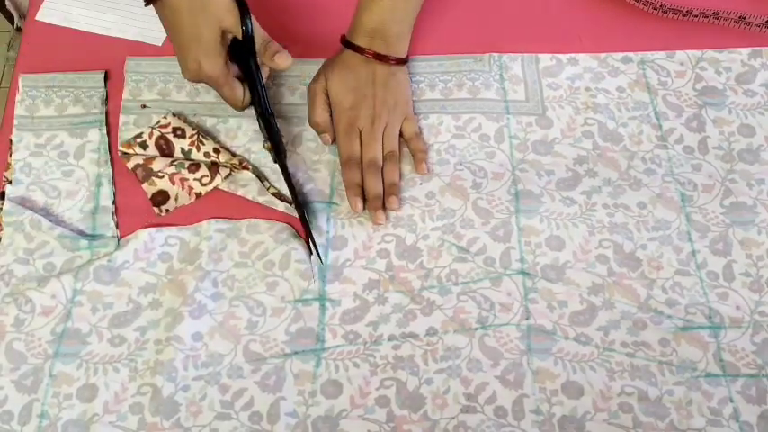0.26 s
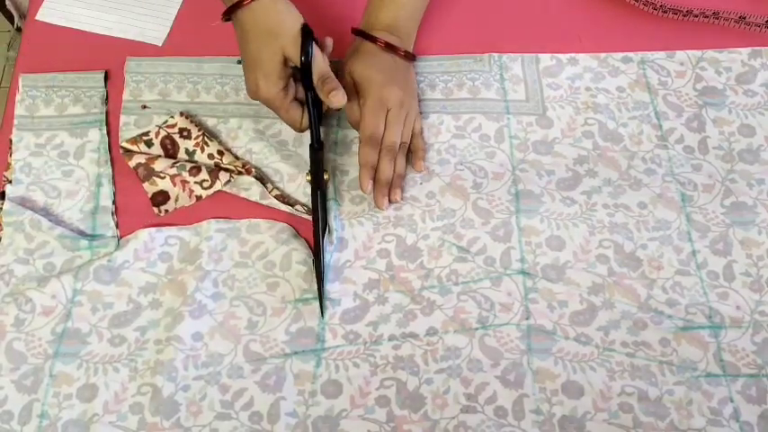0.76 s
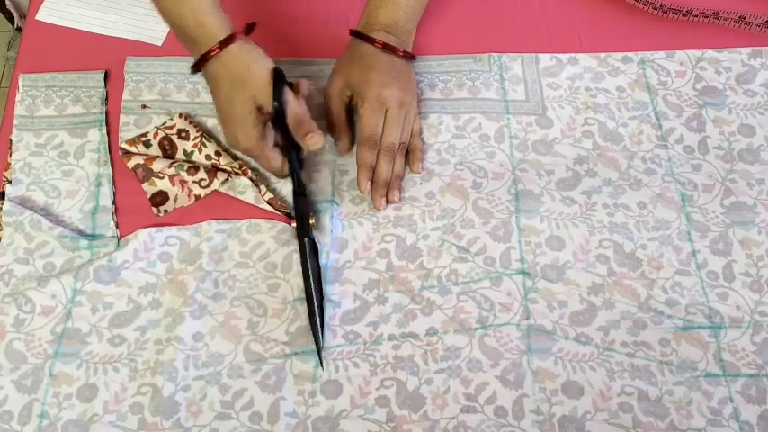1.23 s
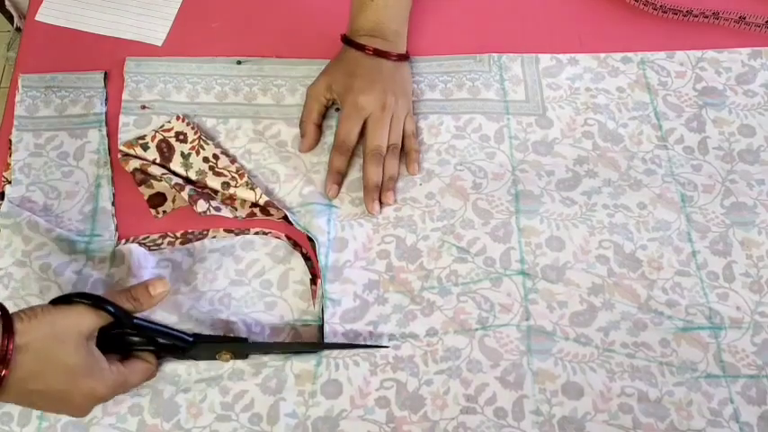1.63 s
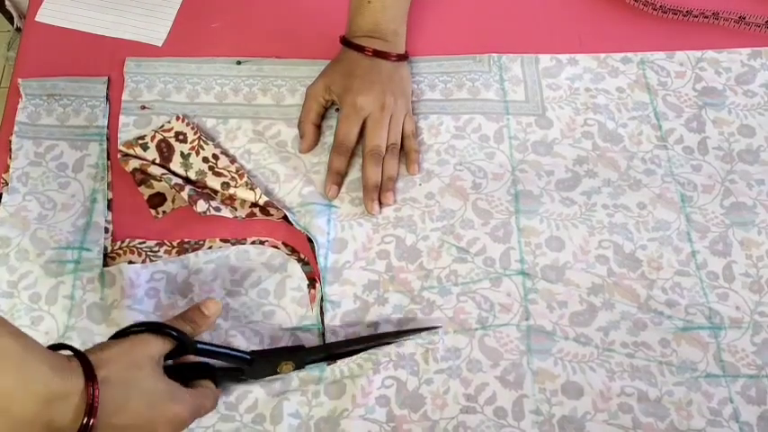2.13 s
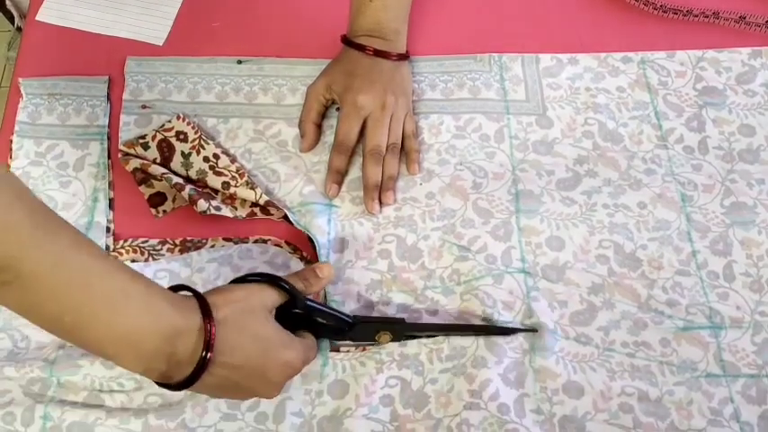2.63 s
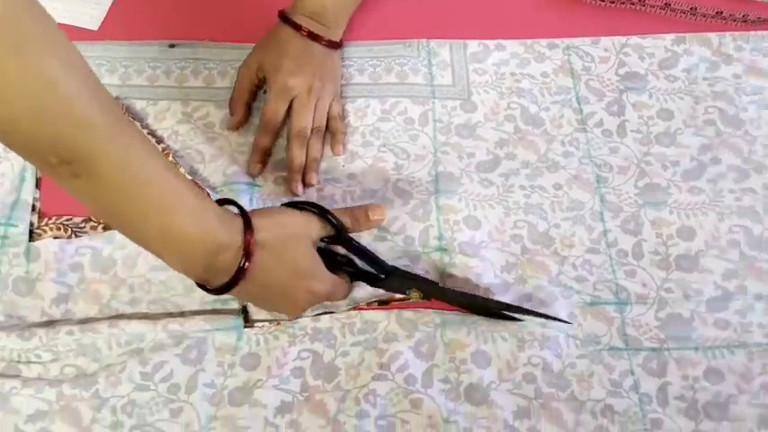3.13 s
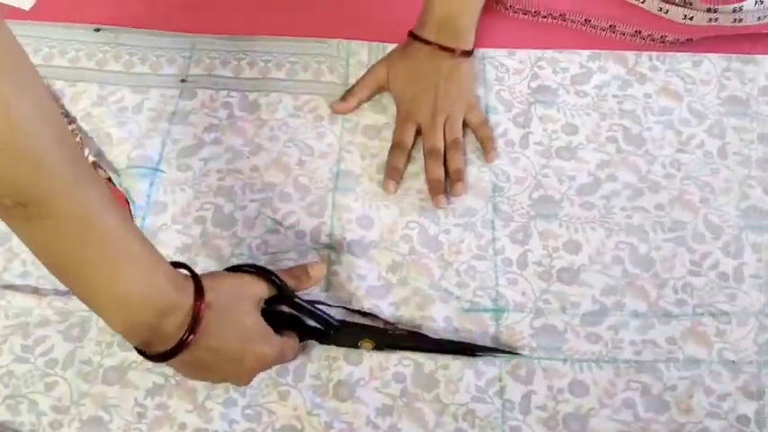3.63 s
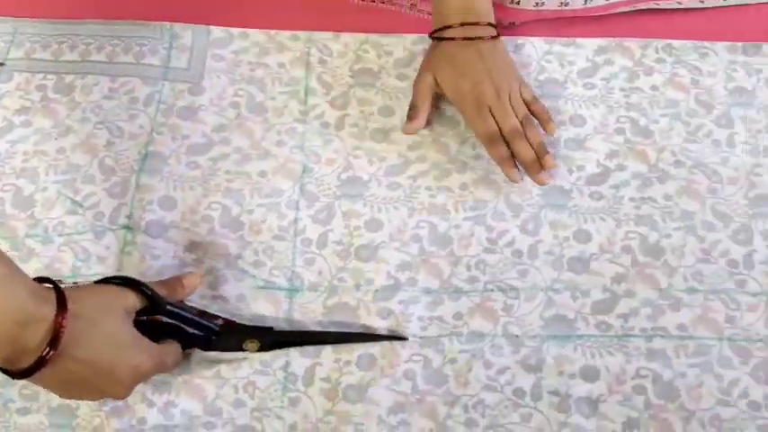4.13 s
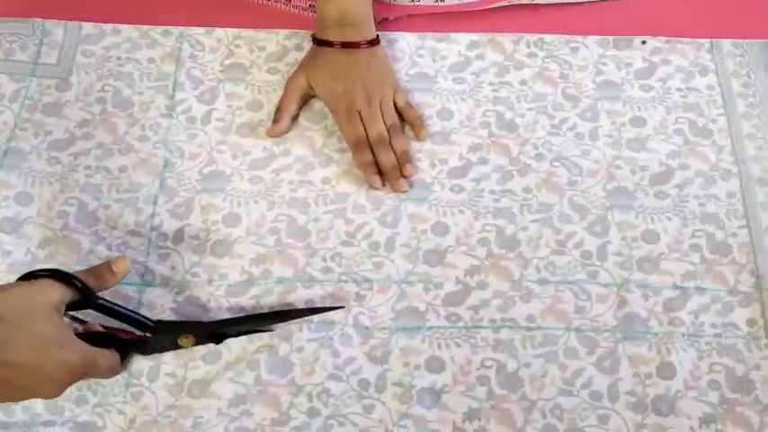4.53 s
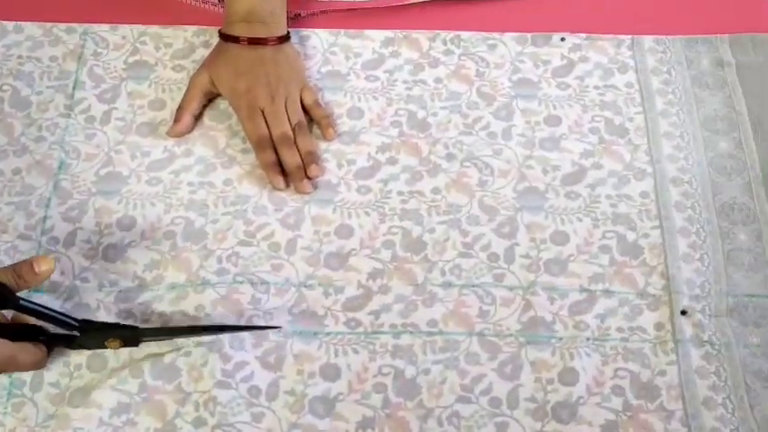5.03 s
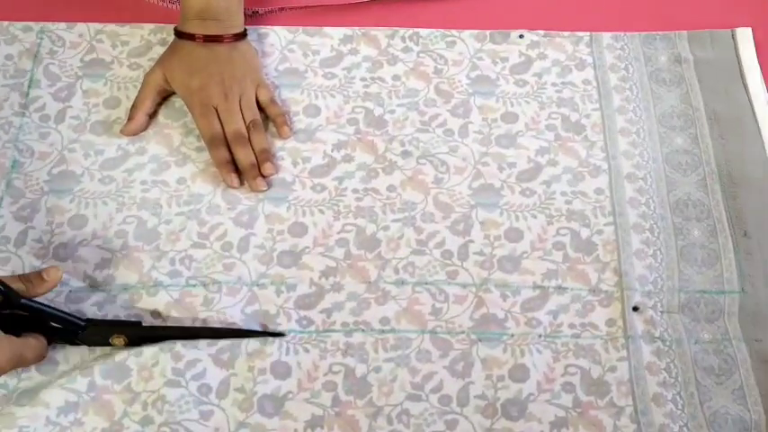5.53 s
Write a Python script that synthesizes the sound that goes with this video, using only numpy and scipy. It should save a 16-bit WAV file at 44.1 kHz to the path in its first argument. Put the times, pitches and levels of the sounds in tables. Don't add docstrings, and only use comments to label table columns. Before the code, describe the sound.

Close, rhythmic snipping of large shears through fabric, each cut a dull tabletop knock with gritty crackle and short metallic clack.

```python
import sys
import numpy as np
from scipy import signal
from scipy.fft import rfft, irfft, next_fast_len
from scipy.io import wavfile
from scipy.ndimage import uniform_filter1d, map_coordinates

SR = 44100
rng = np.random.default_rng(int(sys.argv[2]) if len(sys.argv) > 2 else 0)


def linear_from_db(decibels):
    return 10 ** (np.asarray(decibels, float) / 20)


def store_pcm(level_fs):
    pcm = np.round(np.clip(level_fs, -1, 1) * 32767).astype(np.int16)
    wavfile.write(sys.argv[1], SR, np.atleast_2d(pcm).T)


N = 254016

# (bite time [s], bite length [s], table level [dB], blade level [dB], thread level [dB])
CLOSINGS = [(0.0, 0.02, -47, -55.5, -55.5), (0.231, 0.046, -44, -57.5, -51),
            (0.65, 0.064, -48.5, -59.5, -51), (0.898, 0.045, -49, -51.5, -48.5),
            (1.138, 0.048, -44.5, -58, -51), (1.347, 0.042, -45, -57, -50),
            (1.986, 0.067, -41, -52.5, -49.5), (2.265, 0.051, -43.5, -56, -48.5),
            (2.508, 0.054, -38.5, -50.5, -51.5), (2.758, 0.063, -40.5, -47.5, -57),
            (3.012, 0.041, -59, -46.5, -49.5), (3.243, 0.055, -40, -51, -53.5),
            (3.488, 0.056, -47, -47.5, -54.5), (3.749, 0.064, -42.5, -50, -54.5),
            (4.01, 0.033, -48.5, -50, -56), (4.296, 0.051, -57.5, -51, -59.5),
            (4.559, 0.047, -42.5, -51, -49.5), (4.842, 0.031, -47, -51, -62),
            (5.461, 0.036, -50, -48.5, -61.5), (5.72, 0.036, -47.5, -44, -53)]
# (lead-in [s], lead-in depth [dB], swell [dB/s], release [s], release depth [dB])
STROKE_SHAPES = [
    (0.019, 19, -24.5, 0.042, 26.5),
    (0.017, 31, 23.5, 0.034, 33),
    (0.02, 33, -14, 0.037, 24),
    (0.012, 15, -3, 0.035, 26),
]
# (time [s], low blade mode over high [dB], crackle build-up through a bite [dB])
CLOTH_GRIP = [(0, -5, 2.5), (.65, -1, 11), (1.35, -8, 4), (2.0, 3, 8), (2.26, 7.5, 15.5), (2.8, -4.5, 4.5),
              (3.05, 5.5, 11.5), (3.5, 6, 12), (3.78, 12, 8.5), (4.03, 10.5, 8), (4.32, 4.5, 2),
              (4.58, 0.5, 7.5), (4.86, 3.5, 2), (5.48, 3.5, -6.5), (5.76, 2.5, 5.5)]
GRIND = [
    -3.5,
    -4,
    -1,
    0,
]
# (time [s], steel ring level [dB], knock level [dB],
# rustle level [dB])
OPENINGS = [(0.086, -79, -53, -90), (0.327, -70, -51.5, -79), (0.778, -76, -52.5, -85),
            (1.0017, -73, -51.5, -77), (1.236, -82, -52.5, -94), (2.099, -54, -56, -64),
            (2.619, -60, -44.5, -60), (2.881, -68, -45, -63), (3.1116, -58, -47.5, -57),
            (3.356, -78, -53, -60), (3.565, -45, -61, -59), (3.607, -65, -46.5, -63),
            (3.8644, -62, -55, -63.5), (4.101, -46, -63, -60.5), (4.4163, -59.5, -53.5, -84),
            (4.45, -45, -86, -71), (4.545, -46, -46, -83), (4.662, -64, -46.5, -63), (4.677, -58, -89, -85),
            (5.416, -55, -76, -73), (5.43, -50, -75, -63), (5.579, -70, -56.5, -81),
            (5.589, -55, -75, -62.5), (5.683, -49.5, -80, -72), (5.694, -44.5, -69, -70)]
# (time [s], peak level [dB])
THREAD_SNAPS = [(0.6804, -41), (0.7064, -55), (0.893, -56), (0.922, -42), (0.943, -33), (1.144, -45),
                (1.159, -28), (1.1762, -30.5), (1.3463, -59), (1.969, -37), (2.0113, -34), (2.0466, -35),
                (2.2625, -42), (2.29, -36), (2.3181, -46), (2.393, -42), (2.5087, -61), (2.5386, -36),
                (2.5637, -34), (2.7911, -42), (2.818, -24), (2.9986, -40.5), (3.035, -44), (3.0496, -41),
                (3.238, -42), (3.4815, -48), (3.543, -35.5), (3.753, -44), (3.775, -41), (3.8024, -21.5),
                (4.01, -35), (4.1719, -60), (4.288, -42), (4.4505, -51), (4.844, -38.5), (4.9441, -43),
                (5.4665, -51), (5.628, -49), (5.7284, -52)]
# (time [s], rustle level [dB], table level [dB], length [s])
CLOTH_TUGS = [(.04, -65.5, -59, 0.62), (.195, -59, -59, 0.067), (1.31, -55, -40, 0.058),
              (1.455, -69, -47.5, 0.089), (1.645, -76.5, -59, 0.37), (1.962, -45, -51, 0.019),
              (2.37, -58, -41, 0.057), (2.39, -43, -36.5, 0.031), (2.735, -56, -71, 0.074),
              (2.975, -69, -38.5, 0.072), (3.222, -65, -65, 0.044), (3.46, -54.5, -44, 0.098),
              (3.97, -56, -46.5, 0.037), (4.275, -57, -59, .05), (4.8, -61, -64, 0.07),
              (4.925, -52, -92, 0.073), (5.41, -64, -81, 0.13), (5.5, -57, -77, 0.049),
              (5.685, -54.5, -50, 0.075)]
# (time [s], level of blade resting on the table [dB], cloth drag level [dB])
SLIDING = [(0.0, -62.5, -69.5), (0.46, -60, -80), (1.07, -55, -86), (1.39, -63, -78.5),
           (2.32, -62.5, -83.5), (2.45, -62.5, -82.5), (2.6, -78, -79), (2.71, -60.5, -81),
           (3.5, -62.5, -75.5), (3.88, -69.5, -81.5), (4.38, -60.5, -78.5), (4.49, -74, -73.5),
           (5.07, -65.5, -82), (5.52, -55.5, -81.5), (5.63, -57.5, -86), (5.76, -59, -76)]
# (time [s], peak level [dB])
TABLE_BLOWS = [(0.228, -31), (0.261, -48), (0.652, -35), (0.668, -40), (0.704, -41), (0.901, -32),
               (0.924, -42), (1.014, -48), (1.136, -31), (1.163, -40), (1.182, -28), (1.335, -37.5),
               (1.349, -43), (1.368, -40), (1.39, -45), (1.984, -45), (1.995, -36), (2.006, -42),
               (2.034, -29.5), (2.057, -29.5), (2.254, -28.5), (2.269, -24), (2.284, -44), (2.299, -37),
               (2.319, -36), (2.397, -45), (2.513, -34), (2.532, -26), (2.544, -26), (2.568, -31.5),
               (2.753, -35), (2.771, -34.5), (2.783, -38), (2.797, -44), (2.822, -24.5), (2.849, -33),
               (2.998, -36), (3.029, -39), (3.26, -28), (3.484, -38), (3.503, -41), (3.518, -51),
               (3.763, -49), (3.783, -41), (3.803, -42), (3.819, -36.5), (4.016, -50), (4.032, -38.5),
               (4.053, -41), (4.297, -37.5), (4.31, -41), (4.552, -35.5), (4.566, -31.5), (4.61, -41),
               (4.839, -32), (4.854, -31), (5.135, -36.5), (5.455, -32.5), (5.475, -24), (5.72, -30)]
# (time [s], peak level [dB])
CORNER_BLOWS = [(.098, -57), (.121, -47.5), (.229, -37.5), (.264, -49), (.273, -41), (.333, -43.5),
                (.349, -43), (.654, -34), (.669, -32), (.79, -48), (.926, -37), (1.013, -45),
                (1.078, -48.5), (1.183, -35), (1.248, -51), (1.327, -44), (1.39, -46), (5.39, -52),
                (5.574, -46)]
# (time [s], level over the table top [dB])
CORNER_DRIVE = [(0, -9), (1.4, -8), (2.0, -6), (3.5, -18.5), (5.76, -16)]
# (time [s], peak level [dB])
LOW_BLOWS = [(0.928, -45), (0.942, -51), (1.148, -40.5), (1.183, -50), (1.99, -48), (2.001, -40),
             (2.015, -38), (2.026, -52), (2.051, -57), (2.287, -37), (2.302, -40), (2.32, -53),
             (2.513, -57), (2.534, -41), (2.563, -40.5), (2.76, -42.5), (2.796, -38), (2.816, -44),
             (2.999, -42.5), (3.016, -34), (3.028, -56), (3.04, -53), (3.052, -34.5), (3.063, -39),
             (3.244, -44), (3.258, -49), (3.274, -36.5), (3.284, -43), (3.297, -37.5), (3.481, -42),
             (3.495, -35.5), (3.508, -27.5), (3.526, -31), (3.547, -54), (3.749, -38), (3.76, -34),
             (3.773, -30.5), (3.794, -40), (3.803, -33.5), (3.814, -34), (4.019, -29), (4.036, -39),
             (4.052, -54), (4.297, -38), (4.308, -35), (4.317, -28.5), (4.332, -33.5), (4.345, -52),
             (4.553, -33), (4.566, -37), (4.585, -31), (4.611, -51), (4.845, -35.5), (4.86, -39),
             (5.46, -43), (5.478, -38), (5.496, -62), (5.715, -44), (5.738, -36), (5.752, -47)]
# (time [s], peak level [dB])
HIGH_BLOWS = [(0.094, -43.5), (0.898, -46), (0.909, -50), (0.924, -49), (1.141, -40.5), (1.15, -48),
              (1.162, -49), (1.997, -51), (2.009, -44), (2.048, -41.5), (2.265, -41), (2.305, -39),
              (2.501, -51), (2.527, -47), (2.537, -47), (2.556, -55), (2.566, -43.5), (2.761, -37),
              (2.795, -34), (2.817, -27.5), (2.834, -44), (2.844, -43), (3.016, -42), (3.035, -39),
              (3.052, -32.5), (3.062, -48), (3.071, -38), (3.231, -43.5), (3.241, -45), (3.249, -53),
              (3.269, -55), (3.277, -54), (3.3, -57), (3.5, -60), (3.517, -38), (3.526, -42), (3.541, -46),
              (3.631, -51), (3.745, -48), (3.756, -58), (3.776, -40), (3.806, -39), (3.817, -49),
              (4.014, -42), (4.026, -57), (4.046, -52), (4.299, -40), (4.316, -36.5), (4.327, -44),
              (4.349, -53), (4.55, -50), (4.581, -35), (4.611, -41), (4.855, -44), (4.87, -44),
              (5.477, -37), (5.491, -38), (5.73, -34), (5.746, -48), (5.754, -54)]
# (time [s], peak level [dB])
FREE_BLOWS = [
    (3.271, -45),
    (3.511, -40),
    (3.806, -39.5),
    (4.02, -49),
    (4.318, -33),
    (4.334, -32),
    (4.577, -33.5),
    (4.86, -43.5),
    (5.74, -39),
]
# (time [s], left over right level [dB])
BLADE_SIDE = [(0.0, 3), (0.8, 1), (1.67, 4), (3.75, 3.5), (4.15, 2.5), (5.76, 0)]
# (time [s], ring level [dB], length [s])
TIP_BRUSHES = [
    (2.557, -50, 0.021),
    (3.575, -47, 0.026),
    (4.099, -41, 0.017),
    (4.451, -44, 0.02),
    (5.594, -74, 0.029),
]
# (time [s], level [dB], length [s])
CLOTH_SWISHES = [(1.444, -46, 0.098), (2.384, -36.5, 0.042), (2.431, -57.5, 0.064), (2.79, -37.5, 0.059),
                 (3.03, -39.5, 0.052), (3.331, -52.5, .08), (3.5, -52, 0.11), (3.77, -44, 0.079),
                 (4.201, -56.5, 0.068), (4.5797, -35, 0.068), (4.925, -36, 0.058), (5.715, -52, 0.076)]
# (time [s], level [dB])
EDGE_WHISTLES = [(0.895, -43), (1.1313, -38), (2.258, -29.5), (2.2917, -49), (2.502, -32), (2.763, -37),
                 (2.9964, -37), (3.239, -32), (3.489, -35), (3.751, -33), (4.291, -35), (4.842, -36),
                 (5.4585, -32), (5.706, -32)]
# (time [s], peak level [dB], pitch [Hz], length [s])
LANDINGS = [(0.926, -47, 99, 0.03), (1.513, -69, 94, 0.038), (2.046, -45.5, 154, 0.043),
            (2.403, -40.5, 115, 0.079), (2.438, -57, 75, 0.099), (2.824, -45.5, 144, 0.042),
            (2.998, -55, 108, 0.06), (3.024, -46.5, 156, 0.079), (3.521, -58, 120, 0.045),
            (3.736, -48.5, 134, 0.045), (4.299, -53.5, 104, 0.057), (4.436, -58, 95, 0.037),
            (4.606, -48, 148, 0.037), (5.137, -45, 115, 0.048), (5.73, -54, 101, 0.089)]
# (time [s], level [dB], pitch [Hz], length
# [s])
NARROW_RASPS = [(.621, -61.5, 1200, 0.046), (0.906, -50, 4300, .012), (1.345, -53.5, 4370, 0.023),
                (1.395, -53, 1120, .025), (1.879, -62.5, 1800, 0.035), (1.884, -61, 2310, 0.031),
                (2.376, -55.5, 1103, 0.046), (2.941, -60, 1704, 0.038), (3.315, -55, 1110, 0.022),
                (3.503, -49, 1630, .012), (3.605, -53, 1150, 0.026), (3.769, -47, 1540, .012),
                (3.808, -47.5, 2320, 0.018), (3.867, -61, 1000, .015), (3.874, -60.5, 2220, 0.023),
                (4.411, -61, 1146, 0.03), (4.503, -63.5, 1980, .025), (4.529, -52.5, 8130, 0.028),
                (4.577, -37, 1160, 0.014), (4.6, -51, 1513, 0.054), (4.611, -50, 2130, 0.017),
                (4.661, -57, 1095, 0.023), (4.678, -55, 7500, 0.014), (4.933, -44.5, 2560, 0.032),
                (4.941, -56, 1610, 0.021), (5.405, -62, 7940, .04), (5.425, -51, 8100, 0.034),
                (5.588, -62, 10600, .008)]

# (frequency [Hz], width [Hz], level [dB])
TABLE_MODES = [(177.6, 45.5, -7), (250, 38.7, 0), (315.8, 79.5, -8)]
# (frequency [Hz], width [Hz], level [dB])
SWAY_MODES = [(33.4, 12, 0.17), (107.0, 56, 3.9)]
# (frequency [Hz], width [Hz], level [dB])
CORNER_MODES = [(305.7, 39.6, 0)]
# (frequency [Hz], width [Hz], level [dB])
LOW_BLADE_MODES = [(618, 157, -5), (747, 59.3, 3), (784, 243, -10), (715.5, 21.2, -1)]
# (frequency [Hz], width [Hz], level [dB])
HIGH_BLADE_MODES = [(972, 150, -3.5), (1129, 97.6, 1.5), (1298, 174, -11)]
# (frequency [Hz], width [Hz], level [dB])
FREE_BLADE_MODES = [(726, 18.3, 1.5), (651, 54, -13.5)]
# (frequency [Hz], width [Hz], level [dB])
STEEL_MODES = [(4380, 290, -5), (8020, 170, 3), (8440, 450, 5), (8800, 150, 0.5)]
# (frequency [Hz], width [Hz], level [dB])
TIP_MODES = [(13300, 400, 0), (14100, 500, -5), (14550, 500, -8), (15400, 600, -5)]
# (frequency [Hz], width [Hz], level [dB])
CLOTH_MODES = [(2100, 630, -2), (2560, 830, 1.5), (3830, 4000, -7)]
# (frequency [Hz], density [dB per Hz])
THREAD_SPECTRUM = [(880, -7.5), (1500, -28), (1880, -13), (2680, 1.5), (2990, -4), (4700, -0.5),
                   (5730, -4.5), (6200, -0.5), (8580, -0.5), (9750, 1), (12400, -3), (13500, -0.5),
                   (15800, -6)]
# (frequency [Hz], density [dB per Hz])
HISS_SPECTRUM = [(820, -42), (1400, -0.5), (1490, -6), (2040, -4), (2370, -5.5), (4020, -13.5),
                 (15800, -14.5)]
# (frequency [Hz], density [dB per Hz])
HUM_SPECTRUM = [(12, -69), (20, -44), (65, -8), (162, -7.5), (198, -8), (280, -10), (397, -10), (676, -29),
                (754, -28), (858, -18), (1600, -68), (2080, -74), (3520, -120)]
# (frequency [Hz], time to fall 60 dB [s])
ROOM_DECAY = [(200, 0.25), (2000, 0.21), (10000, 0.012)]
# (frequency [Hz], gain [dB])
MIC_RESPONSE = [(9200, 0.5), (9700, -5.5), (10600, -1.5), (11500, -2), (15400, 1), (15800, -13)]

OPEN_S, OPEN_BLADE_DB, OPEN_GRIP = 0.048, -11.5, 0.75
DRAG_BLADE_DB, DRAG_BLADE_SHARE = -65.5, 0.15
HISS_DB = 5


def scissors():
    table, low, high, crackle = strokes()
    rest_db, drag_db = curves(SLIDING)
    grip_db = OPEN_GRIP * curves(CLOTH_GRIP)[0]
    opens = [(*row, OPEN_S) for row in OPENINGS]
    snaps = [(*row, 0.008) for row in THREAD_SNAPS]
    knock = bursts(opens, column=2)
    rub = linear_from_db(DRAG_BLADE_DB + DRAG_BLADE_SHARE * (drag_db - drag_db.mean()))

    table = table + linear_from_db(-6.0 - grip_db) * knock
    table = table + linear_from_db(-5.5) * bursts(CLOTH_TUGS, column=2, rise=0.0086)
    table = table + linear_from_db(-5.0) * linear_from_db(rest_db + 2.0)
    low = low + linear_from_db(-11.0) * rub
    high = high + linear_from_db(OPEN_BLADE_DB + grip_db) * knock + linear_from_db(-10.5) * rub

    crackle = crackle + linear_from_db(-2.5) * bursts(CLOTH_TUGS, column=1, rise=0.021)
    rustle = crackle + linear_from_db(-2.5) * bursts(opens, column=3)
    rustle = rustle + linear_from_db(-12) * bursts(snaps, column=1, rise=0.0031)
    steel = linear_from_db(-8.5) * bursts(opens, column=1, rise=0.00024)
    steel = steel + linear_from_db(-16.5) * bursts(snaps, column=1, rise=0.00036) + linear_from_db(-13.0) * crackle
    return table_drum(table) + blades(low, high) + threads(rustle) + steel_ring(steel) + swishes()


def strokes():
    gain, t = np.zeros((4, N)), np.arange(N) / SR
    tilt, build = curves(CLOTH_GRIP)
    for s, length, table_db, blade_db, thread_db in CLOSINGS:
        at = round(s * SR)
        ends = [table_db, blade_db + tilt[at], blade_db, thread_db]
        for k, (lead, lead_db, swell, release, release_db) in enumerate(STROKE_SHAPES):
            start = ends[k] - swell * length
            if k == 3:
                start -= build[at]
            times = [s - lead, s, s + length, s + length + release]
            levels = [start - lead_db, start, ends[k], ends[k] - release_db]
            gain[k] += linear_from_db(np.interp(t, times, levels, -200, -200))
    return gain * linear_from_db(GRIND)[:, None]


def table_drum(gain):
    push = ports(0.9, 100, 2.4)
    drum = excite(push, gain, modes(TABLE_MODES))
    drum = drum + linear_from_db(-2.5) * struck(TABLE_BLOWS, TABLE_MODES, 0.00005, soft_hz=586)
    sway = linear_from_db(-9.5) * excite(push, gain, modes(SWAY_MODES))
    corner = excite(push, gain * linear_from_db(curves(CORNER_DRIVE)[0]), modes(CORNER_MODES))
    corner = corner + struck(CORNER_BLOWS, CORNER_MODES, 0.00005, soft_hz=900)
    return drum + sway + corner


def blades(low_gain, high_gain):
    low = excite(ports(0.053, 110, 2.5), low_gain, modes(LOW_BLADE_MODES))
    low = low + linear_from_db(2.5) * struck(LOW_BLOWS, LOW_BLADE_MODES, 0.00034, soft_hz=1800)
    free = struck(FREE_BLOWS, FREE_BLADE_MODES, 0.0001, soft_hz=1800)
    high = excite(ports(-0.34, 120, 2.64), high_gain, modes(HIGH_BLADE_MODES))
    high = high + linear_from_db(1.5) * struck(HIGH_BLOWS, HIGH_BLADE_MODES, 0.00019, soft_hz=3000)
    return (low + free + high) * pan(curves(BLADE_SIDE)[0])


def threads(gain):
    parting = ports(0.029, 900, 0.71, 0.0001) + 0.34 * ticks(1500, spread_db=3)
    return excite(patchy(parting, 3.98), gain * linear_from_db(1.53 * wobble(90)), colour(THREAD_SPECTRUM))


def ticks(rate, spread_db):
    size = linear_from_db(spread_db * rng.exponential(size=N)) * rng.choice([-1, 1], N)
    size = size * (rng.random(N) < rate / SR)
    return unit(size * rng.normal(0.24, 1, (2, N)))


def steel_ring(gain):
    scrape = ports(0.32, 200, 1.4, 0.00015)
    ring = excite(scrape, gain, lambda f: modes(STEEL_MODES)(f) ** 2)
    tip_gain = linear_from_db(-8.5) * bursts(TIP_BRUSHES, column=1, rise=0.0006) + linear_from_db(-18) * gain
    tips = excite(scrape, tip_gain, lambda f: modes(TIP_MODES)(f) ** 2)
    return ring + tips * linear_from_db([[-1.5], [1.5]])


def swishes():
    gain = linear_from_db(-6.0) * bursts(CLOTH_SWISHES, column=1, rise=0.034)
    return excite(patchy(ports(0.31, 500, 1.3), 0.78), gain, modes(CLOTH_MODES))


def squeal():
    out, t = np.zeros((2, N + SR)), np.arange(SR // 25) / SR
    for s, db in EDGE_WHISTLES:
        hz = 12550 + 16000 * t + 150 * rng.standard_normal()
        flutter = unit(uniform_filter1d(rng.standard_normal((2, len(t))), size=110))
        swell = linear_from_db(db - 17.5) * np.abs(np.sin(np.pi * t / t[-1])) * flutter
        tone = np.sin(2 * np.pi * np.cumsum(hz) / SR)
        out[:, round((s - 0.006) * SR):][:, :len(t)] += swell * tone
    return out[:, :N]


def thuds():
    out, t = np.zeros(N + SR), np.arange(SR // 6) / SR
    click = linear_from_db(-1.5 - 60 * t / 0.01) * (1 - np.exp(-t / 0.0013)) * np.sin(2 * np.pi * 480 * t)
    for s, db, hz, length in LANDINGS:
        swing = np.sin(2 * np.pi * hz * t * (0.954 + 0.64 * np.exp(-t / 0.0055)))
        out[round(s * SR):][:len(t)] += linear_from_db(db + 5.5 - 60 * (t / length) ** 2) * (swing + click)
    return out[:N]


def narrow_rasps():
    out, t = np.zeros((2, N + SR)), np.arange(SR // 10) / SR
    for s, db, hz, length in NARROW_RASPS:
        rasp = unit(uniform_filter1d(rng.standard_normal((2, len(t))), size=90))
        swell = linear_from_db(db - 20 * (t / length) ** 2) * (1 - np.exp(-t / 0.0024))
        out[:, round(s * SR):][:, :len(t)] += swell * rasp * np.sin(2 * np.pi * hz * t)
    return out[:, :N]


def room(x):
    hz, t, z = signal.stft(rng.standard_normal((2, SR // 3)), SR, nperseg=256)
    decay = linear_from_db(-60 * t / along(ROOM_DECAY, hz)[:, None])
    tail = signal.istft(z * decay, SR, nperseg=256)[1]
    return signal.fftconvolve(x, tail / np.linalg.norm(tail[0]), axes=1)[:, :N]


def background():
    hum = linear_from_db(-56.5 - 9.0) * unit(filtered(ports(0.36, 20, 3.1), colour(HUM_SPECTRUM)))
    hiss = unit(filtered(ports(0.039, 36, 1.0), colour(HISS_SPECTRUM)))
    return hum + linear_from_db(curves(SLIDING)[1] + HISS_DB) * hiss


def ports(alike, lump_rate, lump_db, lag_s=0.):
    turn = np.arccos(np.clip(alike, -1, 1)) / 2
    mix = np.array([[np.cos(turn)], [np.sin(turn)]])
    mid, side = rng.standard_normal((2, N)) * mix * linear_from_db(lump_db * wobble(lump_rate))
    return unit(np.array([np.roll(mid + side, round(lag_s * SR)), mid - side]))


def excite(force, gain, response):
    return filtered(force * gain, lambda hz: unit(response(hz)))


def struck(events, table, lag_s, soft_hz):
    blows = np.zeros((2, N))
    for (s, db), side in zip(events, rng.uniform(-1.03, 1, len(events))):
        arrivals = s + lag_s * side * np.array([1, -1])
        blows[[0, 1], np.round(arrivals * SR).astype(int)] += linear_from_db(db)
    first_swing = 2 * np.pi * max(w * linear_from_db(db) for _, w, db in table) / SR
    return filtered(blows, lambda f: modes(table)(f) / (1 + 1j * f / soft_hz) ** 2) / first_swing


def bursts(events, column, rise=0.0031):
    gain, t = np.zeros(N + SR), np.arange(SR // 5) / SR
    for row in events:
        push = linear_from_db(row[column] - 27.5 * (t / row[-1]) ** 2) * (1 - np.exp(-t / rise))
        gain[round(row[0] * SR):][:len(t)] += push
    return gain[:N]


def modes(table):
    def response(f):
        total = 0
        for k, (c, w, db) in enumerate(table):
            total = total + (-1) ** k * linear_from_db(db) * 1j * f * w / (c * c - f * f + 1j * f * w)
        return total
    return response


def colour(spectrum):
    return lambda hz: linear_from_db(along(spectrum, hz))


def filtered(x, response):
    m = next_fast_len(N + SR // 2)
    return irfft(rfft(x, m) * response(np.fft.rfftfreq(m, 1 / SR)), m)[..., :N]


def patchy(x, depth_db):
    z = signal.stft(x, nperseg=256)[2]
    field = uniform_filter1d(rng.standard_normal(z.shape[1:]), size=2, axis=0)
    field = uniform_filter1d(field, size=9, axis=1)
    return signal.istft(z * linear_from_db(depth_db * unit(field)), nperseg=256)[1][:, :N]


def wobble(rate):
    return map_coordinates(rng.standard_normal(int(N * rate / SR) + 4), [np.arange(N) * rate / SR])


def curves(rows):
    s, *cols = np.transpose(rows)
    return np.array([np.interp(np.arange(N) / SR, s, c) for c in cols])


def along(points, hz):
    f, v = np.transpose(points)
    return np.interp(np.log(hz + 1), np.log(f + 1), v)


def pan(db):
    return linear_from_db(np.array([db, -db]) / 2)


def unit(x):
    return x / np.sqrt(np.mean(np.abs(x) ** 2) + 1e-20)


def scene():
    near = scissors() + squeal() + thuds() + narrow_rasps()
    return near + linear_from_db(-21.0) * room(near) + background()


def roll_off(x):
    return signal.sosfilt(signal.butter(12, 15830, fs=SR, output="sos"), x)


def record(dry):
    mix = filtered(dry, colour(MIC_RESPONSE))
    return roll_off(mix)


dry = scene()
out = record(dry)
store_pcm(out)
```